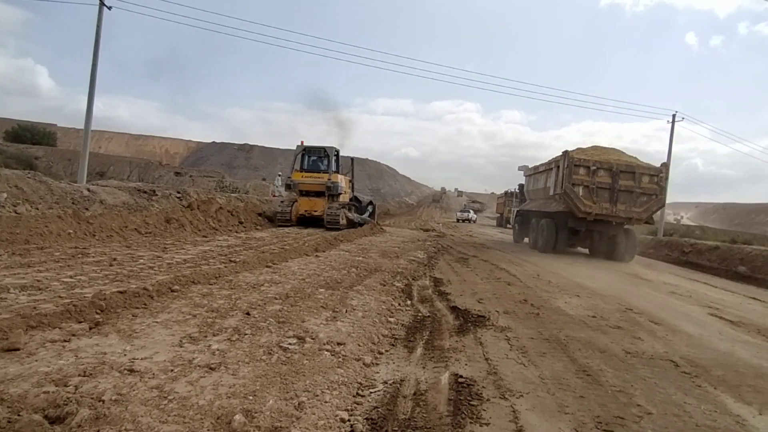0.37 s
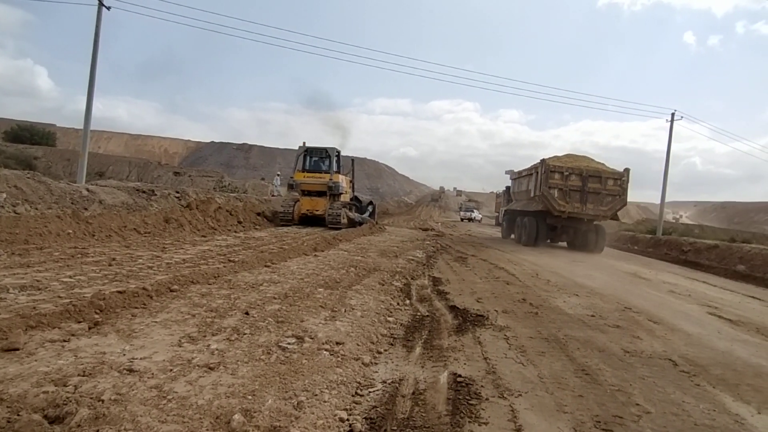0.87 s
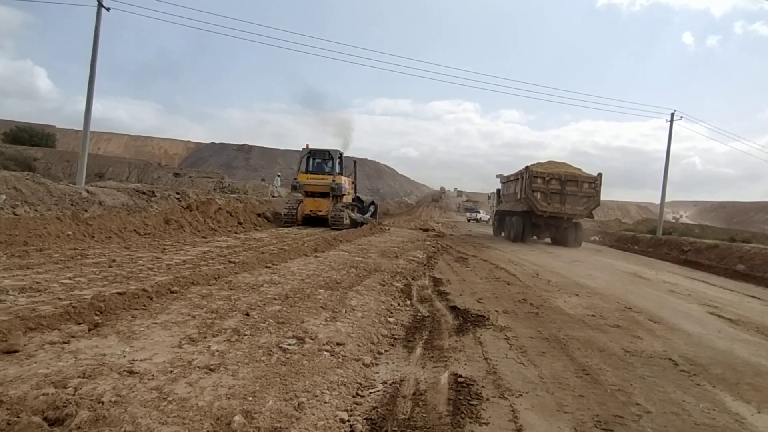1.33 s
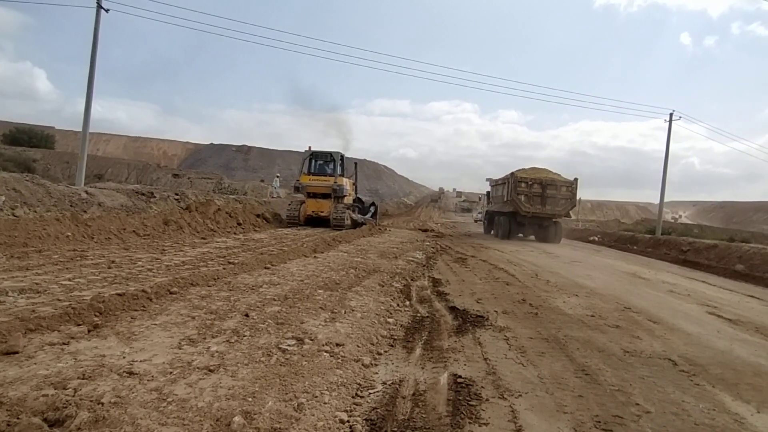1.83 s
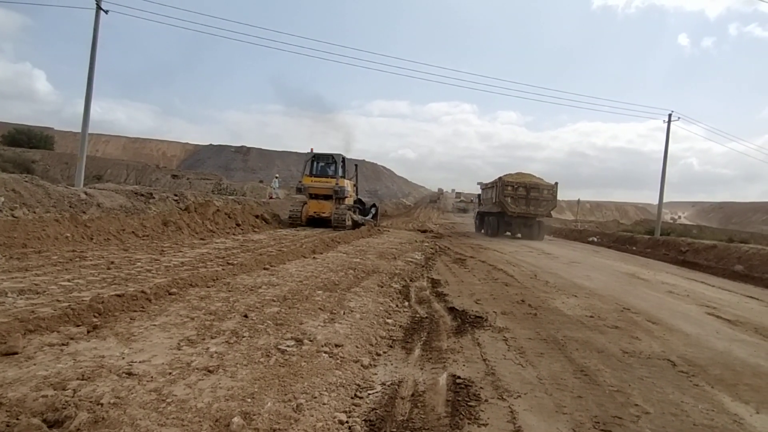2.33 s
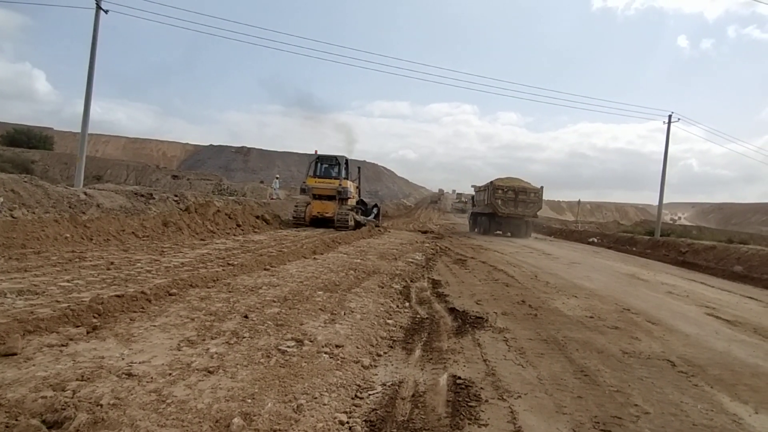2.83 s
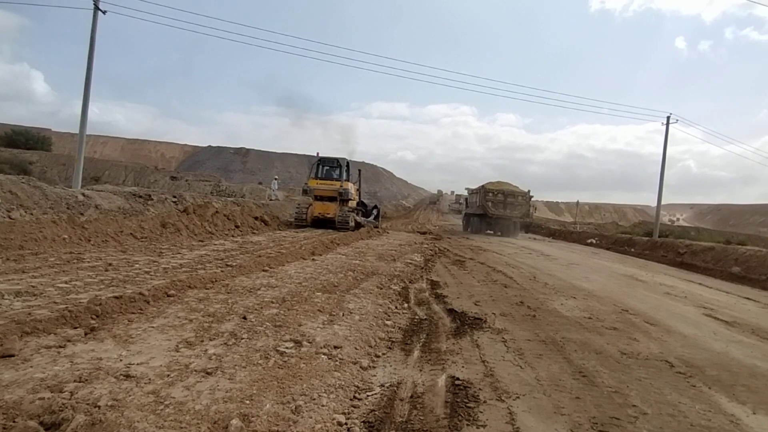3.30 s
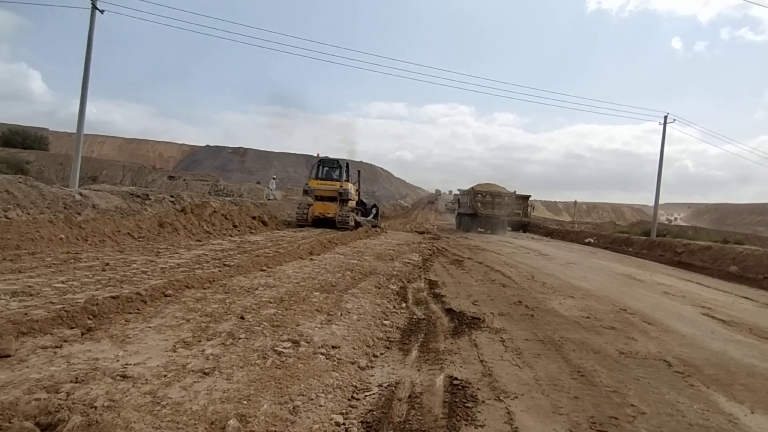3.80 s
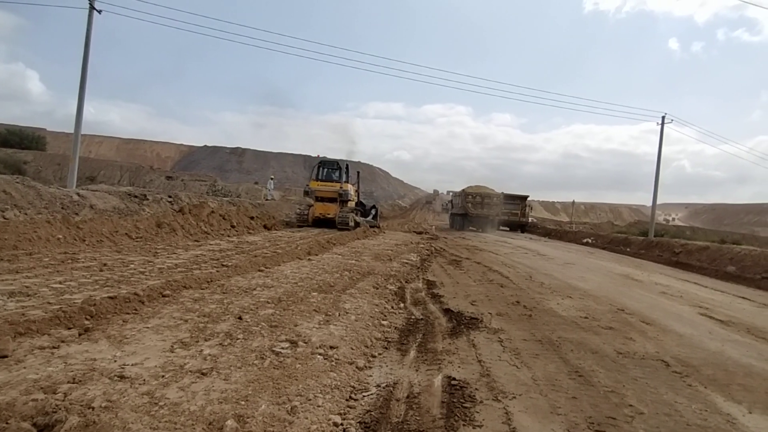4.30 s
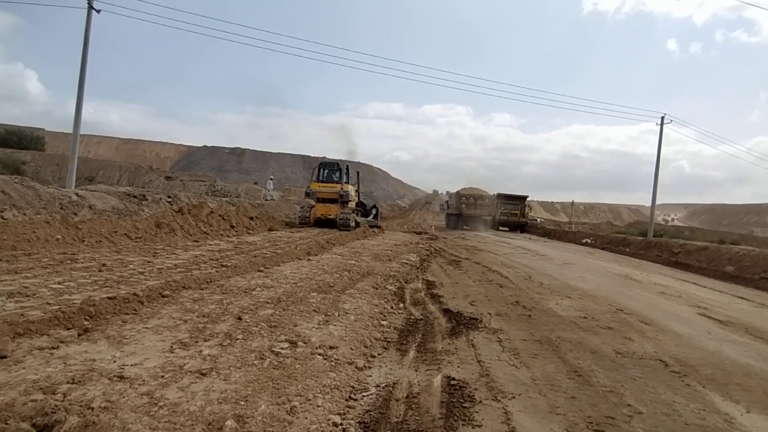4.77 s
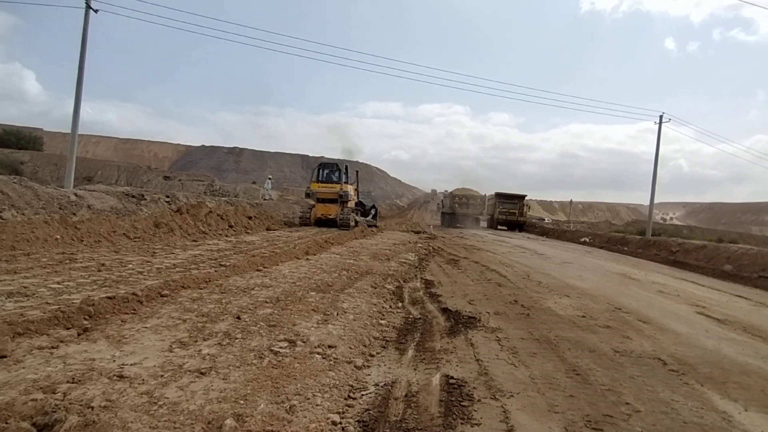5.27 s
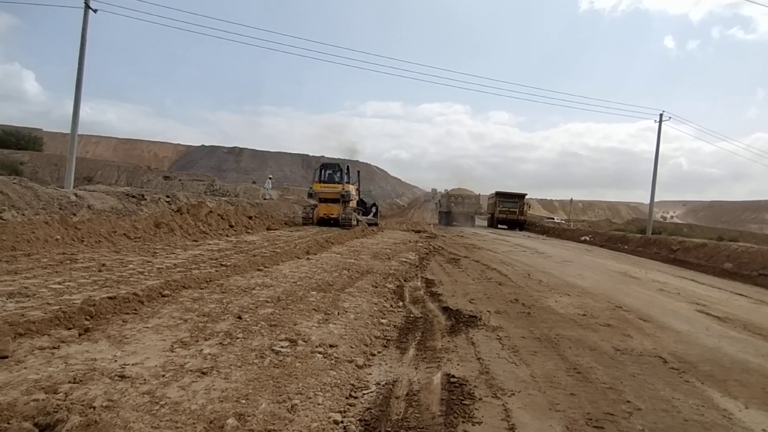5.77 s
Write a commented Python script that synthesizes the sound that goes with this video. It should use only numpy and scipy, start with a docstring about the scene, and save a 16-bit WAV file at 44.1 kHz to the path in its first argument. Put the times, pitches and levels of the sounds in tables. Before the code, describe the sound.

At an open dirt road site, a heavy dump truck close by drones low and roars as it drives off, easing its throttle at about two seconds with a breathy hiss and short faint whistles. A bulldozer's slower, lumpier diesel then climbs steadily, steel tracks squeaking and ticking, and ends in hard exhaust barks. Light wind buffets and low rumble stay underneath; a small single-channel microphone outdoors.

```python
"""At an open earthworks site, diesel engines are heard by a small microphone.
A loaded dump truck drives away and lifts off the throttle; a bulldozer takes load and grows louder,
its tracks squeaking now and then; another truck hums for a while far down the road.
Engines are sums of sines tied to the turning of the crank, plus a roar of shaped noise.
Hiss, rumble and wind are shaped noise; whistles and squeaks are trembling tones or narrow noise."""
import sys
import numpy as np
from scipy import signal
from scipy.io import wavfile
from scipy.ndimage import uniform_filter1d

SR = 44100
rng = np.random.default_rng(int(sys.argv[2]) if len(sys.argv) > 2 else 0)


def waveform_to_disk(signal):
    """Save audio, clipped to [-1, 1], as 16-bit WAV at the path in sys.argv[1]."""
    frames = np.transpose(np.atleast_2d(signal))
    scaled = np.clip(frames, -1, 1) * 32767
    samples = np.round(scaled).astype(np.int16)
    wavfile.write(sys.argv[1], SR, samples)


def volts_from_decibels(level):
    """Turn decibel levels (scalar or array-like) into linear amplitude factors."""
    exponent = np.asarray(level, float) / 20
    return 10 ** exponent


N = 259308  # length of the scene in samples
FULL_DB = -10  # level of the main engine order that counts as full throttle or load


def evened(x):
    """Scales a signal to rms 1, so that a later gain sets its level."""
    return x / np.sqrt(np.mean(x ** 2) + 1e-20)


def curves(rows):
    """Draws straight lines between the rows of a table: one signal for each column after the time."""
    times, *columns = np.transpose(rows)
    return [np.interp(np.arange(N) / SR, times, column) for column in columns]


def swell(start, rise, hold, fall, top):
    """Goes in a straight line from 0 to top, holds and returns to 0 (all times in s)."""
    corners = np.cumsum([start, rise, hold, fall])
    return np.interp(np.arange(N) / SR, corners, [0, top, top, 0])


def wander(seconds):
    """Slow chance of rms 1: random numbers averaged twice over the given time."""
    size = max(round(seconds * SR), 2)
    smooth = uniform_filter1d(rng.standard_normal(N), size)
    return evened(uniform_filter1d(smooth, size))


def fluttering(orders):
    """Lets weak engine orders come and go by slow chance."""
    flutter_db, flutter_s = 1.8, .1
    return [(k, db + flutter_db * wander(flutter_s)) for k, db in orders]


def resonate(x, hz, width):
    """A resonance: shifts the pitch hz down to zero, smooths twice and shifts back."""
    turn = np.exp(2j * np.pi * np.cumsum(hz * np.ones(N)) / SR)
    r = np.exp(-np.pi * width / SR)
    low = signal.lfilter([1 - r], [1, -r], x / turn)
    low = signal.lfilter([1 - r], [1, -r], low)
    return 2 * (turn * low).real


def whistle(hz, width):
    """Wide whistles are noise in a resonance, narrow ones a sine whose pitch and level tremble."""
    if width > 100:
        return evened(resonate(rng.standard_normal(N), hz, width))
    tremble_hz = width / 2 * wander(0.251 / width)
    level = volts_from_decibels(0.87 * wander(.01))
    return np.sqrt(2) * level * np.sin(2 * np.pi * np.cumsum(hz + tremble_hz) / SR)


def noise(colour, size, patchy_db, flicker_db, bumps=(), tilt=None):
    """Random short-time spectra with drifting patches and a flicker shared by all pitches.
    tilt: two curves in dB per octave, a lift above 8 kHz and a fill from 7 down to 3 kHz."""
    hop = size // 4
    frames, hz = N // hop + 5, np.fft.rfftfreq(size, 1 / SR)
    a, b, patches = rng.standard_normal((frames, len(hz), 3)).T
    patches = evened(uniform_filter1d(uniform_filter1d(patches, 6, 0), 8, 1))
    flicker = evened(uniform_filter1d(rng.standard_normal(frames), 3))
    colour_hz, colour_db = np.transpose(colour)
    shape = np.interp(np.log(hz + 1), np.log(colour_hz + 1), colour_db, -150, -150)
    for mid_hz, width, top_db in bumps:
        shape = shape + top_db / (1 + (2 * (hz - mid_hz) / width) ** 2)
    field_db = shape[:, None] + patchy_db * patches + flicker_db * flicker
    if tilt is not None:
        at = np.minimum(np.arange(frames) * hop, N - 1)
        octaves_up = np.log2(np.maximum(hz, 8000) / 8000)
        octaves_down = np.log2(7000 / np.clip(hz, 3000, 7000))
        field_db += octaves_up[:, None] * tilt[0][at] + octaves_down[:, None] * tilt[1][at]
    spectra = (a + 1j * b) * volts_from_decibels(field_db)
    return evened(signal.istft(spectra, nperseg=size, noverlap=size - hop)[1][:N])


def engine(hz, orders, waver_db, slip, locked=(), start=0.):
    """Exhaust orders (multiples of the base rate hz) as sines on one crank angle, wavering a little.
    Locked orders all peak near angle 0, reached at the time start: one pulse a cycle."""
    angle = 2 * np.pi * np.cumsum(hz) / SR
    angle = angle - angle[round(start * SR)]
    out = np.zeros(N)
    for k, db in orders:
        phase = 2 * np.pi * rng.random() + slip * wander(0.025)
        out += volts_from_decibels(db + waver_db * wander(0.036)) * np.sin(k * angle + phase)
    for k, db in locked:
        out += volts_from_decibels(db + 2.4 * wander(0.1)) * np.cos(k * angle + .5 * wander(0.058))
    return angle, np.sqrt(2) * out


def wind():
    """A light breeze as very low noise, with a lull and a few gusts on the microphone."""
    # colour of the wind: (frequency [Hz], level [dB per Hz])
    wind_colour = [(8, -32), (20, 0), (35, 20), (55, -1), (80, -7), (120, -35)]
    # gusts: (start [s], hold [s], level [dB])
    gusts = [(-.08, .06, 17), (.46, .17, 11), (1.37, .02, 8), (1.56, .02, 16), (3.6, .2, 9),
             (3.97, .18, 11), (4.85, .06, 10), (5.12, .15, 9)]
    edge_s = .09
    breeze_db, freshen_db_per_s = -49, 0.3
    gusts_db = sum(swell(s, edge_s, hold, edge_s, db) for s, hold, db in gusts)
    lull_db = swell(1.7, rise=.4, hold=.85, fall=.25, top=-11)
    level_db = breeze_db + freshen_db_per_s * np.arange(N) / SR + lull_db + gusts_db
    return volts_from_decibels(level_db) * noise(wind_colour, size=4096, patchy_db=4.5, flicker_db=1.)


def rumble():
    """Low noise between the engine orders, drifting slowly and swelling at times."""
    # colour of the rumble: (frequency [Hz], level [dB])
    rumble_colour = [(40, -47), (60, -14), (75, -6), (100, 4.5), (140, 7), (190, 5), (250, 6.5), (300, -12),
                     (400, -4.5), (500, -44)]
    # swells of the rumble: (start [s], rise [s], hold [s], fall [s], level [dB])
    heaves = [(4.76, .1, .02, .1, 11), (1.8, .9, .4, .6, 3)]
    rumble_db, drift_db = -23, 1
    level_db = rumble_db + drift_db * wander(0.23) + sum(swell(*row) for row in heaves)
    return volts_from_decibels(level_db) * noise(rumble_colour, size=4096, patchy_db=3.5, flicker_db=0.1)


def far_truck():
    """Two unsteady engine orders are all that carries from far away; they swell up and fade."""
    # the orders that carry: (order [multiple of the base rate], level the swell is added to [dB])
    far_orders = [(2, -53), (4, -47.5)]
    base_hz, gain_hz_per_s = 42.0, .27
    heard_db = swell(2.1, rise=.55, hold=1.8, fall=.6, top=26)
    hz = base_hz + gain_hz_per_s * np.arange(N) / SR
    _, tones = engine(hz, far_orders, waver_db=1.5, slip=0.63)
    fade = np.minimum(heard_db / 6, 1)  # silent before and after the swell
    return fade * volts_from_decibels(heard_db) * tones


def hiss(truck_angle, nearness, dozer_angle, work_db):
    """Treble noise of both near machines, chopped lightly by their firings."""
    # colour of the hiss: (frequency [Hz], level [dB])
    hiss_colour = [(3000, -35.5), (4200, -13.5), (5200, -16), (6000, -11.4), (6900, -5.5), (7600, 1.1),
                   (8000, -0.5), (8500, -3.5), (9500, -9), (10500, -15), (11700, -18.4), (13100, -16.5),
                   (14200, -10.6), (15400, -7), (16000, -6)]
    truck_db, dozer_db, dozer_follow = -40.5, -35, 0.48  # the last is the share of the work dB
    fill_from_db, fill = -26.5, 1.3  # fill: dB per octave for each dB of work above fill_from_db
    level = np.hypot(volts_from_decibels(truck_db) * nearness, volts_from_decibels(dozer_db + dozer_follow * work_db))
    # blown-off air brightens the hiss as the truck lifts off; hard work fills it below 7 kHz
    blow_off = swell(1.7, rise=.6, hold=.1, fall=.7, top=4.5)
    hard_work = fill * np.maximum(work_db - fill_from_db, 0)
    chop = 1 + 0.054 * np.cos(2 * truck_angle) + 0.15 * np.cos(3 * dozer_angle)
    sound = noise(hiss_colour, size=512, patchy_db=2.2029, flicker_db=1.1, tilt=(blow_off, hard_work))
    return level * chop * sound


def whistles():
    """Whistles and whines, likely turbochargers, gears and panels: each glides evenly, fading in and out."""
    # whistles: (start [s], length [s], first pitch [Hz], last pitch [Hz], width [Hz])
    glides = [(2.02, .45, 15200, 13900, 700), (3.2, 1.75, 15280, 13900, 110), (4.2, 2.2, 9200, 10400, 1100),
              (4.75, 1.6, 6700, 7200, 60), (5.42, .6, 1026, 1000, 5), (2.0, .38, 1145, 1125, 40),
              (2.08, .26, 1235, 1210, 60), (-.5, 2.7, 940, 935, 80), (-.2, .8, 1240, 1290, 40),
              (1.3, .6, 780, 785, 50), (2.03, .24, 760, 750, 50), (-.05, .45, 445, 447, 16),
              (.9, 1.25, 452, 464, 14), (5.27, .4, 2235, 2310, 8)]
    # one level for each whistle: (level [dB])
    glide_levels = [-49, -63, -53, -57, -31, -33, -36.5, -35.5, -34.5, -36.5, -36, -27.5, -28.5, -39]
    # short thin peeps: (time [s], level [dB])
    peep_rows = [(2.14, -55), (2.82, -61), (2.98, -53), (3.62, -57), (4.32, -55)]
    edge_share, depth_db = .2, 22  # share of the length spent rising or falling, and by how much
    peep_hz, peep_edge_s = 3920, .085  # a peep falls 20 dB within its edge
    t, out = np.arange(N) / SR, np.zeros(N)
    for (s, length, first_hz, last_hz, width), db in zip(glides, glide_levels):
        edge = edge_share * length
        up_db = swell(s, edge, length - 2 * edge, edge, depth_db)
        hz = np.interp(t, [s, s + length], [first_hz, last_hz])
        out += (up_db > 0) * volts_from_decibels(db - depth_db + up_db) * whistle(hz, width)
    peeps = sum(volts_from_decibels(db - 20 * abs(t - s) / peep_edge_s) for s, db in peep_rows)
    return out + peeps * whistle(peep_hz, 25)


def squeaks():
    """Short scrapes of steel on steel excite three rings of the bulldozer's track links."""
    # scrapes: (time [s], low ring [dB], middle ring [dB], high ring [dB])
    scrapes = [(.269, -59, -36.5, -59.5), (.878, -29, -43, -57), (1.667, -28.5, -46, -54),
               (3.362, -55, -33, -43), (3.779, -51.5, -53, -51), (3.991, -22.5, -37.5, -47),
               (4.003, -32, -37, -46.5), (4.02, -47, -35, -53), (4.141, -43, -42.5, -49),
               (4.256, -43.5, -39, -46.5), (4.721, -34, -34, -52), (4.789, -44, -55, -52),
               (4.864, -52, -43.5, -52), (4.961, -41, -39.5, -52), (5.599, -31, -46, -53)]
    # rings of the links: (pitch [Hz], width [Hz])
    rings = [(2570, 70), (7600, 900), (13900, 1600)]
    rise_s, fall_s = 0.0025, 0.0086
    t, out = np.arange(N) / SR, np.zeros(N)
    since = [np.maximum(t - row[0], 0) for row in scrapes]
    shapes = [2 * np.exp(-u / fall_s) * (1 - np.exp(-u / rise_s)) ** 2 for u in since]
    for k, (hz, width) in enumerate(rings):
        level = sum(volts_from_decibels(row[1 + k]) * shape for row, shape in zip(scrapes, shapes))
        out += level * whistle(hz, width)
    return out


def truck():
    """The leaving truck: orders of the exhaust, and a roar that swells with each firing.
    The roar fades with distance and throttle; the main and upper orders follow the throttle fully."""
    # engine over time: (time [s], base rate [Hz], order 4, which follows the throttle [dB rms])
    engine_rows = [(0, 40.44, -8.5), (.2, 39.88, -12), (.42, 39.05, -8.5), (.54, 40.52, -10.5),
                   (.9, 40.31, -10.4), (1.02, 40.5, -9.5), (1.15, 41.75, -10), (1.5, 41.57, -10.5),
                   (1.85, 42.74, -13), (1.98, 42.3, -15.5), (2.1, 41.55, -18.5), (2.24, 40.35, -24),
                   (2.46, 40.16, -30), (2.8, 40.4, -63)]
    # unsteady orders: (order [multiple of the base rate], level re order 4 at full throttle [dB])
    weak_rows = [(2, -18), (3, -16.5), (5, -18.5), (6, -18)]
    # upper orders: (order [multiple of the base rate], level re order 4 [dB])
    upper_rows = [(7, -24.5), (8, -28.5), (9, -26.5), (10, -33), (11, -25), (12, -24.5), (13, -30)]
    # colour of the roar: (frequency [Hz], level [dB])
    roar_colour = [(200, -42), (280, -0.3), (400, -2), (560, -14.5), (690, -16.5), (1000, -10),
                   (1400, -14.5), (1700, -21.1), (1950, -27.5), (2150, -19), (2700, -22), (3300, -31),
                   (3900, -33), (4300, -47), (5200, -47), (6500, -67)]
    # bumps on that colour: (middle [Hz], width [Hz], height [dB])
    body_bumps = [(505, 40, 5), (810, 90, 5), (930, 90, 3), (1070, 90, -4), (1240, 110, 6), (1700, 150, 3),
                  (2300, 140, 4)]
    start_m, speed_m_per_s = 33, 6.1
    roar_db, roar_follow, weak_follow = -22.6, 0.088, 0.19  # follow: share of the throttle drop

    hz, level_db = curves(engine_rows)
    drop_db = level_db - FULL_DB
    # weak orders follow the throttle a little, then die away quickly once it is nearly shut
    heard_db = FULL_DB + np.minimum(weak_follow * drop_db, 3 * (drop_db + 19.5))
    boom_db = swell(.2, rise=.28, hold=.36, fall=.35, top=12)  # order 6 booms for a while
    weak = fluttering([(k, heard_db + db + (k == 6) * boom_db) for k, db in weak_rows])
    upper = [(k, level_db + db) for k, db in upper_rows]
    angle, tones = engine(hz, [(4, level_db)] + weak + upper, waver_db=.4, slip=.06)
    roar = noise(roar_colour, size=1024, patchy_db=.6, flicker_db=.5, bumps=body_bumps)
    distance_ratio = 1 + speed_m_per_s / start_m * np.arange(N) / SR
    nearness = volts_from_decibels(roar_follow * drop_db) / distance_ratio
    throb = 1 + 0.16 * np.cos(2 * angle)
    return angle, nearness, tones + volts_from_decibels(roar_db) * nearness * roar * throb


def dozer():
    """The bulldozer: exhaust orders at a lower speed, firing on order 3, and a roar that follows the work.
    Single hard firings bark in the pipe as short tones."""
    # engine over time: (time [s], exhaust load as order 6 [dB rms],
    # unevenness of the firings as order 9 [dB rms], work of blade and tracks [dB])
    engine_rows = [(0, -20.5, -23, -40.5), (1, -28, -31, -39), (1.9, -23, -28, -31),
                   (2.5, -19.5, -22.5, -31), (2.75, -21.5, -18.5, -29), (3.1, -17.5, -16, -29.5),
                   (3.42, -14, -15, -28), (3.8, -13.5, -14.5, -27.5), (4.2, -13, -14, -28),
                   (4.6, -11.5, -16, -26.5), (4.95, -10.5, -16.5, -25.5), (5.3, -13.5, -13, -23),
                   (5.63, -11.5, -19, -22), (5.88, -10, -29.5, -23)]
    # unsteady orders: (order [multiple of the base rate], level [dB], share of the work level [dB per dB])
    weak_rows = [(12, -22.5, .3), (13, -28.5, 0.08), (14, -18.5, .22)]
    # other orders: (order [multiple of the base rate], level re order 9 [dB])
    other_rows = [(4, -39), (5, -38), (7, -11.5), (8, -39), (10, -12.5), (11, -18)]
    # upper orders: (order [multiple of the base rate], level re their common level [dB])
    upper_rows = [(15, -3.5), (16, -2), (17, -8), (18, -16.5), (19, -18), (20, 3), (21, -8.5), (24, -14.5),
                  (25, -13.5), (26, 0), (27, -8), (28, -1.5), (29, -15.5), (30, -20), (32, -16.5),
                  (33, -11.5)]
    # colour of the roar: (frequency [Hz], level [dB])
    roar_colour = [(200, -34), (280, 4), (360, -4), (420, -14.5), (500, -4.5), (690, -10), (1000, -8.5),
                   (1400, -11), (1900, -15), (2250, -14), (2900, -23), (3500, -30), (4000, -38.5),
                   (4600, -41), (6500, -51)]
    # single hard firings under load: (time [s], peak level [dB], pitch [Hz])
    pops = [(4.766, -17, 450), (4.826, -8.5, 290), (4.873, -18, 425), (4.888, -12, 280)]
    light_hz, pick_up_s, gain_hz_per_s = 17.4, 2.6, .29  # cycles per second, and how they pick up
    upper_db, upper_follow, bark_upper = -20, 0.68, 0.24  # shares of the work and of the bark
    loud_firing_s = 5.432  # one moment at which the loudest cylinder fires
    run_s, run_db, run_hz = 5.427, -18.5, 525  # first of four barks, one a cycle
    pop_rise_s = .0055

    t = np.arange(N) / SR
    hz = light_hz + gain_hz_per_s * np.maximum(t - pick_up_s, 0)
    load_db, uneven_db, work_db = curves(engine_rows)
    # order 3 grows with both load and unevenness
    half_beat_db = uneven_db - 19 + 1.9 * (load_db - FULL_DB)
    main = [(3, half_beat_db), (6, load_db), (9, uneven_db)]
    # order 12 swells under the heaviest push, order 13 while the engine picks up speed
    bark_db = swell(4.8, rise=.3, hold=.4, fall=.2, top=11)
    drone_db = swell(2.2, rise=.2, hold=1.2, fall=.5, top=6)
    weak = fluttering([(k, db + share * work_db + (k == 12) * bark_db + (k == 13) * drone_db)
                       for k, db, share in weak_rows])
    other = [(k, uneven_db + db) for k, db in other_rows]
    common_db = upper_db + upper_follow * work_db + bark_upper * bark_db
    upper = [(k, common_db + db) for k, db in upper_rows]
    angle, tones = engine(hz, main + weak + other, waver_db=.4, slip=.06,
                          locked=upper, start=loud_firing_s)
    roar = noise(roar_colour, size=512, patchy_db=1.2, flicker_db=.7)
    throb = 1 + 0.097 * np.cos(3 * angle) + 0.055 * np.cos(angle)
    cycle_s = 1 / hz[round(run_s * SR)]
    run = [(run_s + k * cycle_s, run_db, run_hz) for k in range(4)]
    for s, db, pop_hz in list(pops) + run:
        u = np.maximum(t - s, 0)
        shape = u / pop_rise_s * np.exp(1 - u / pop_rise_s)
        tones += volts_from_decibels(db) * shape * np.sin(2 * np.pi * pop_hz * u)
        throb += 0.22 * shape  # the roar jumps with each bark
    return angle, work_db, tones + volts_from_decibels(work_db) * roar * throb


def scene():
    """All machines, the rumble of the site and a little wind, added as one channel."""
    truck_angle, nearness, leaving = truck()
    dozer_angle, work_db, pushing = dozer()
    treble = hiss(truck_angle, nearness, dozer_angle, work_db) + whistles() + squeaks()
    return (wind() + rumble() + far_truck() + treble + leaving + pushing)[None]


def roll_off(x):
    """The treble ends steeply here."""
    return signal.sosfilt(signal.butter(12, 16960, fs=SR, output="sos"), x)


def record(dry):
    """The loudest peaks bend over softly near full scale; then the highest treble is cut off."""
    knee, edge_hz = 0.78, 15760  # knee: the level where bending begins, full scale being 1
    over = np.maximum(abs(dry) - knee, 0)
    bent = dry - np.sign(dry) * (over - (1 - knee) * np.tanh(over / (1 - knee)))
    low_pass = signal.firwin(511, edge_hz, window=("kaiser", 9), fs=SR)
    finished = signal.oaconvolve(bent, low_pass[None], "same")
    return roll_off(finished)


dry = scene()
out = record(dry)
waveform_to_disk(out)
```